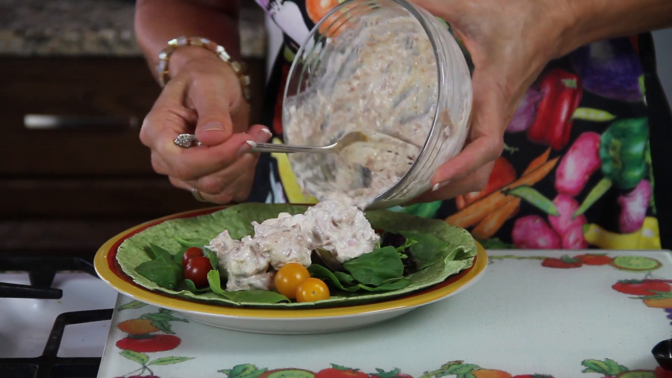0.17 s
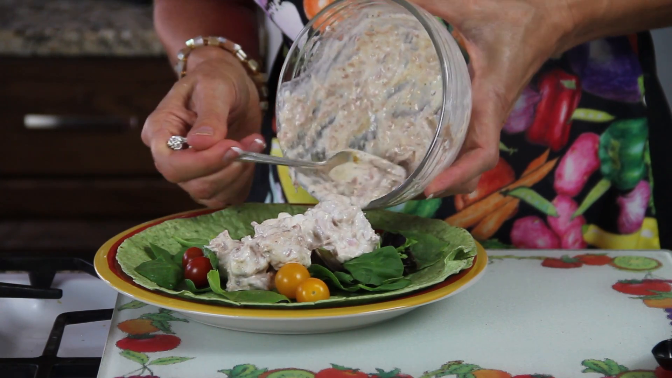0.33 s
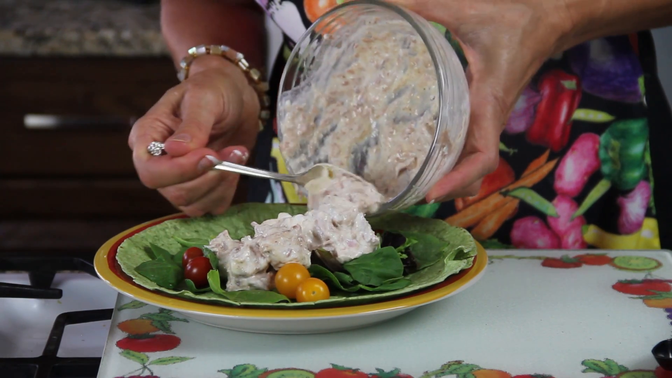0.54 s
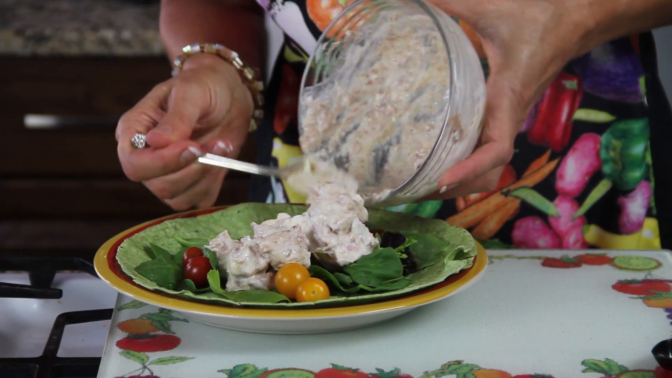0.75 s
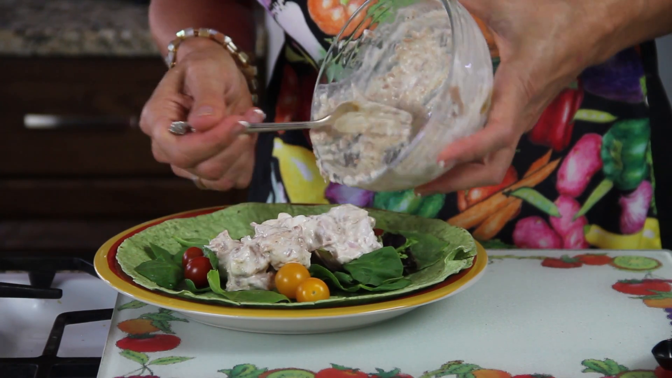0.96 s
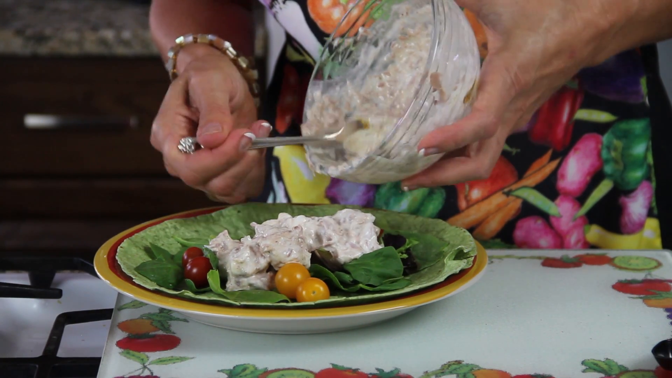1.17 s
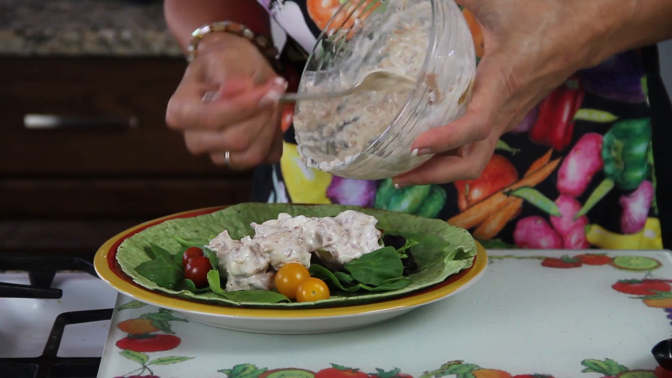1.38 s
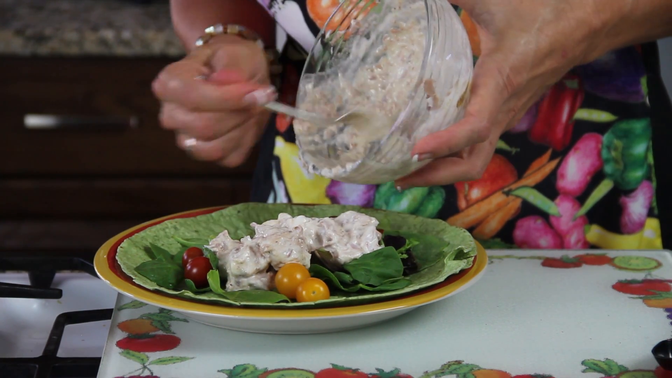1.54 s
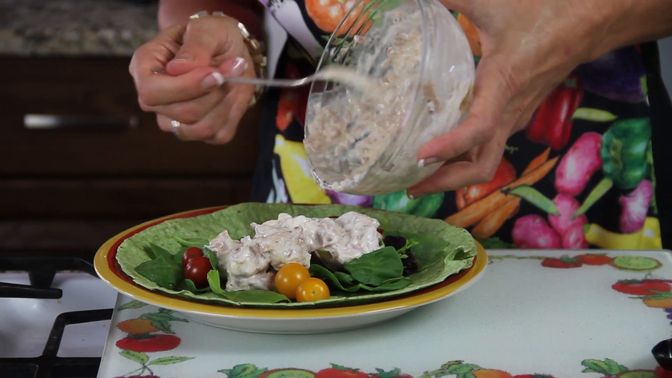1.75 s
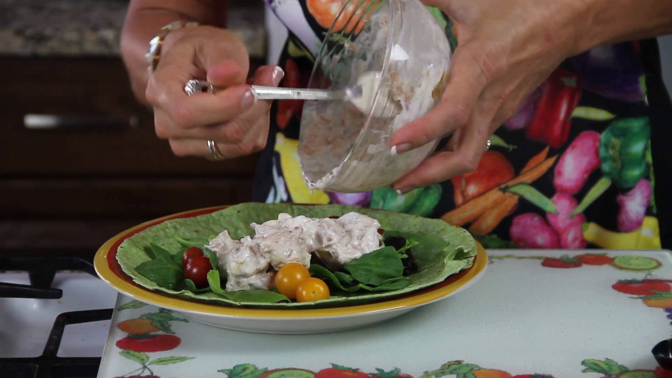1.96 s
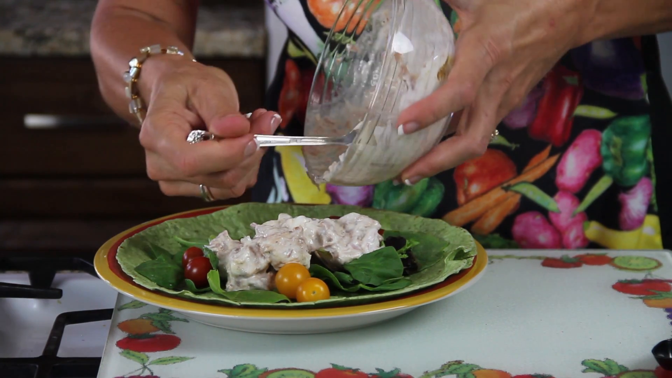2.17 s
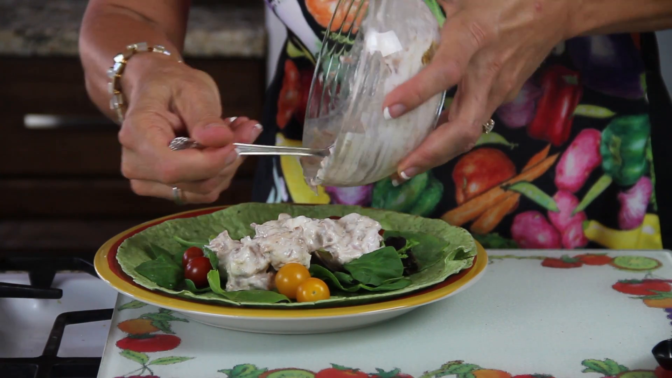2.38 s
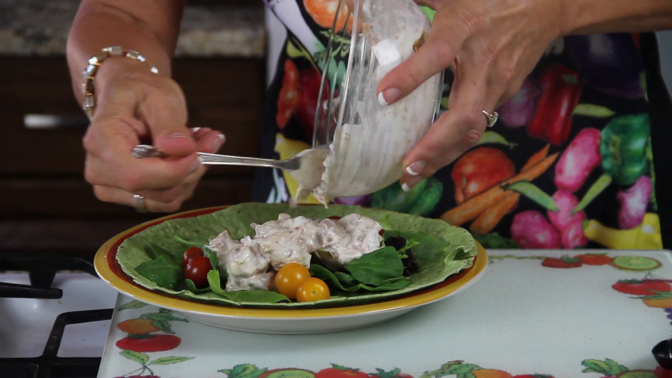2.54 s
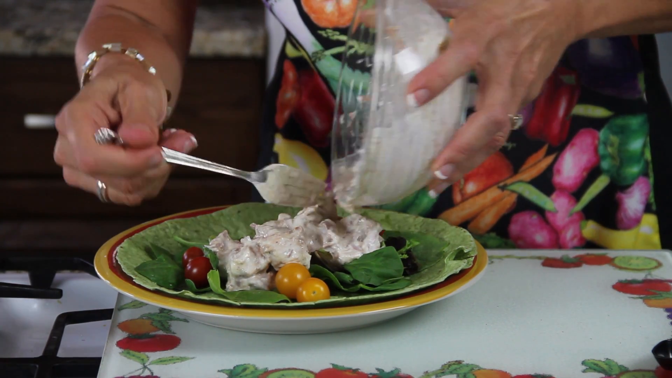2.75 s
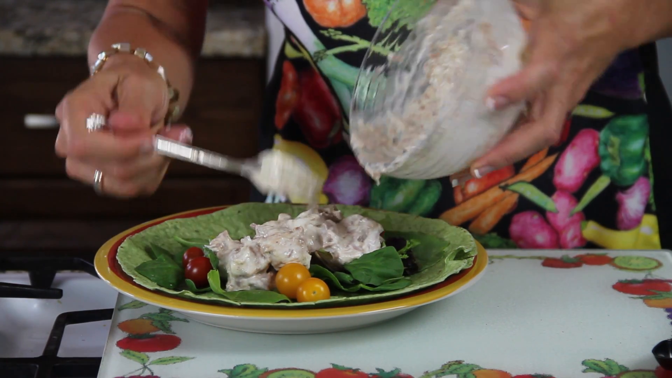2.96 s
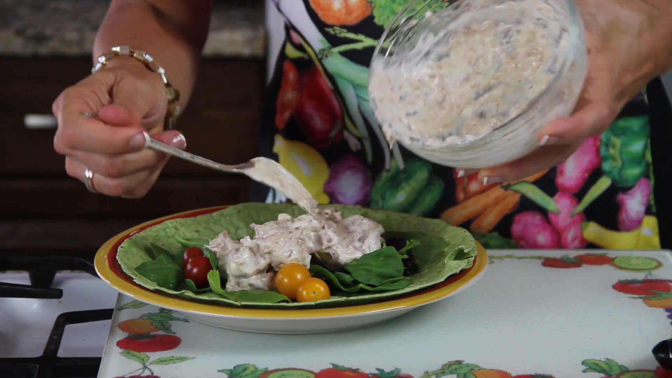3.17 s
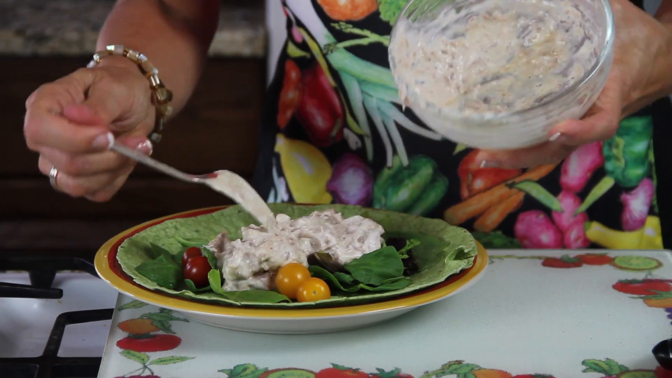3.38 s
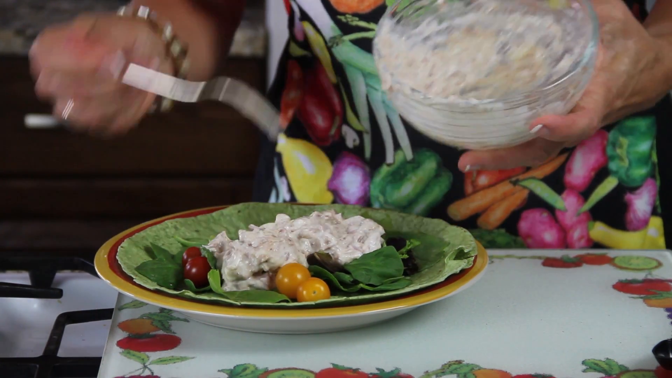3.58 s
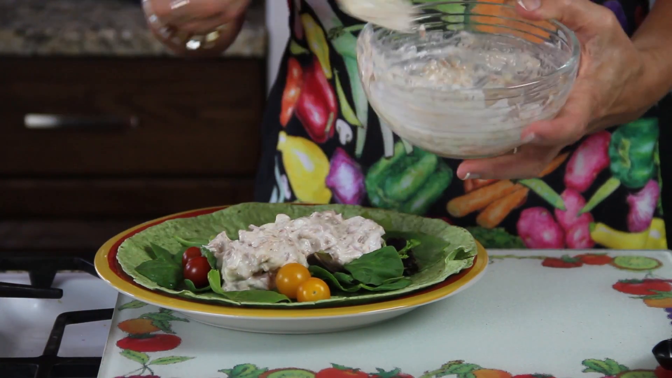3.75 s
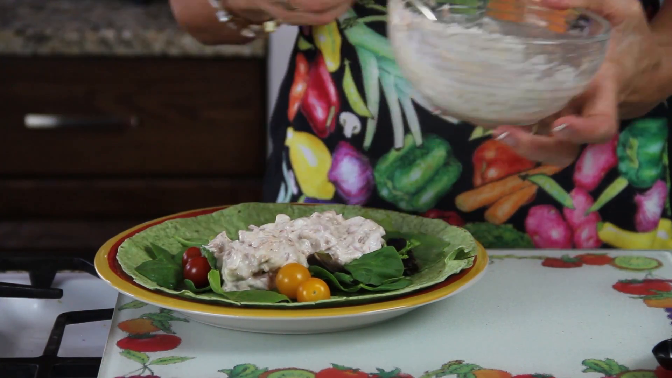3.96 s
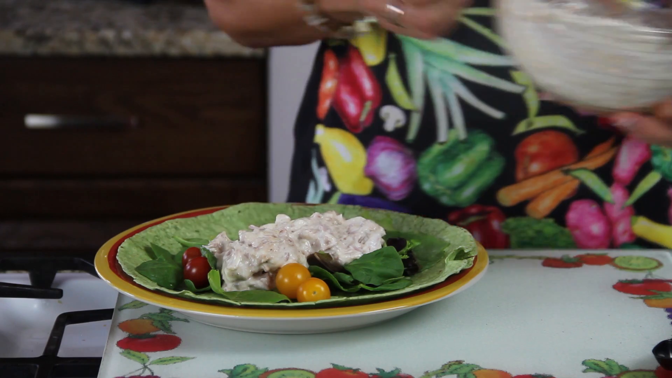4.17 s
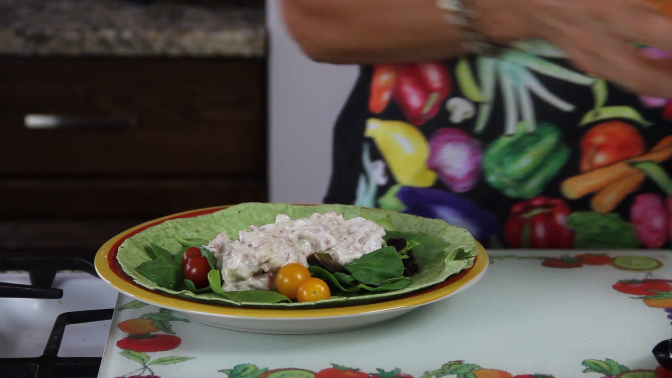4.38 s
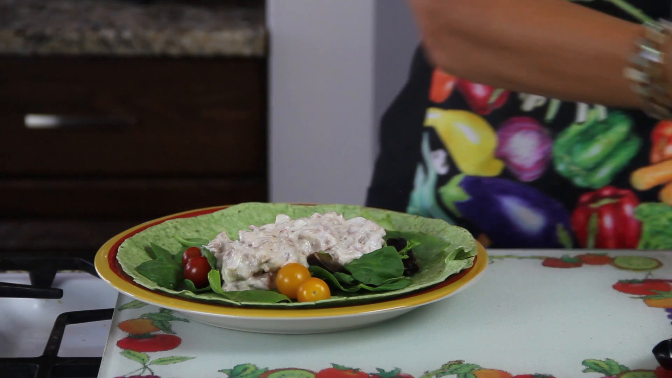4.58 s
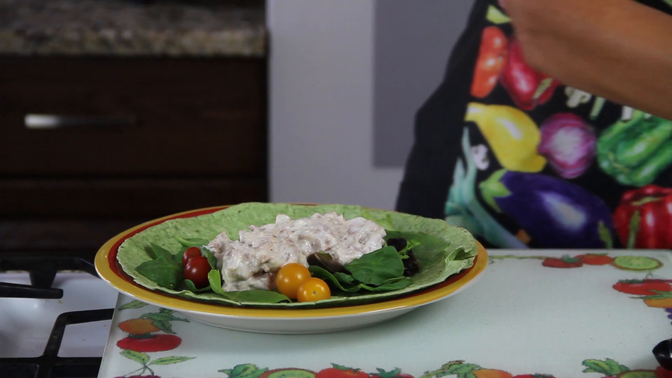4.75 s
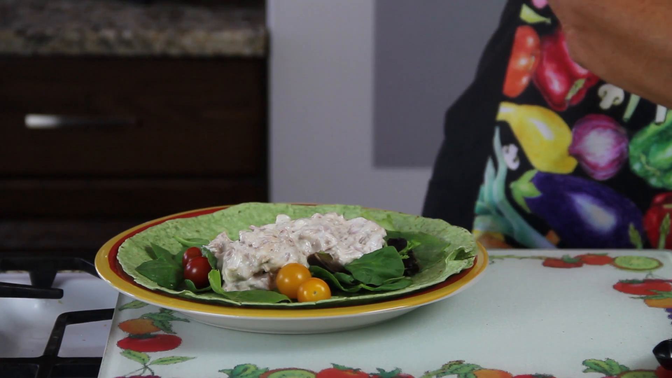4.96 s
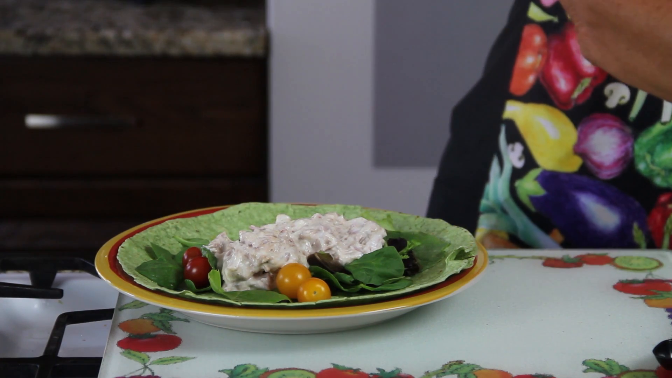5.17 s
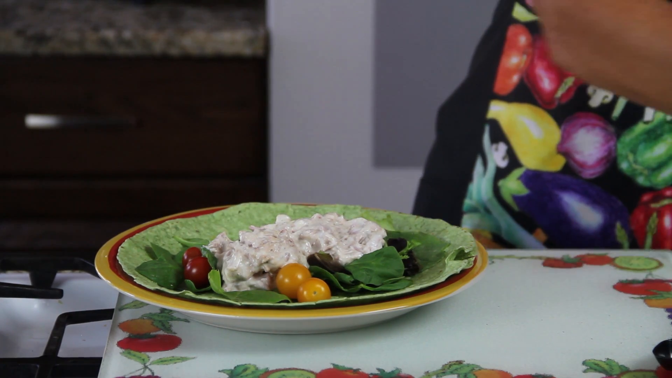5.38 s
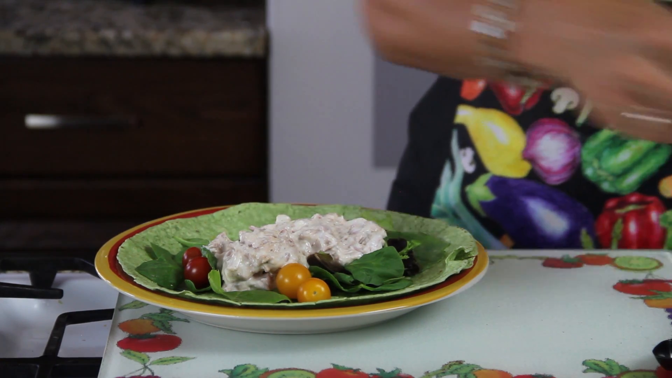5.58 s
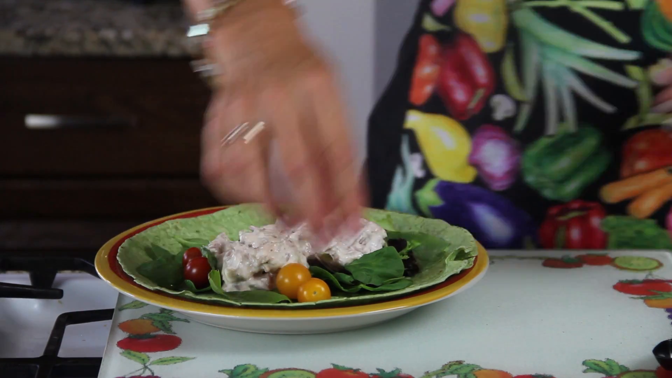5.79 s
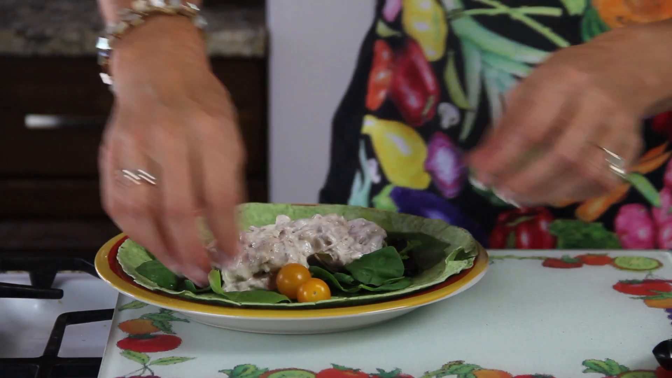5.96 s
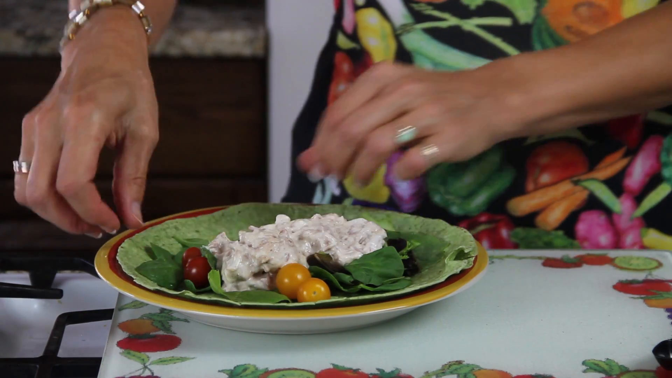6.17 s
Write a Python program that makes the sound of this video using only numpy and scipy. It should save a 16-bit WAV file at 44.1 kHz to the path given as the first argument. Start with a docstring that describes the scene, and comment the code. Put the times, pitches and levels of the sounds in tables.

```python
"""A low room rumble and faint hiss, then a steel fork taps and skids on a hand-held glass bowl of soft salad.
The fork is dropped into the bowl, which is carried aside and set on the counter: it knocks, rocks back, and
the fork rattles. Arms and apron swish as the cook turns and reaches for the plate. Taps and pings are damped
modes plus noise bursts, skids are random slips exciting fork and bowl, landings are decaying noise and cabinet
modes, and cloth and room are coloured noise."""
import sys
import numpy as np
from scipy import signal
from scipy.fft import rfft, irfft, next_fast_len
from scipy.io import wavfile

SR = 44100
rng = np.random.default_rng(int(sys.argv[2]) if len(sys.argv) > 2 else 0)


def unload_wav(signal):
    """Save mono or channel-first audio to the path in sys.argv[1] as 16-bit WAV at rate SR, clipped to [-1, 1]."""
    wavfile.write(
        sys.argv[1],
        SR,
        np.round(np.clip(np.atleast_2d(signal).T, -1, 1) * 32767).astype(np.int16),
    )


N = 274522
T = np.arange(SR * 3 // 4) / SR  # time axis of a single hit [s]


def amp(db):
    """Decibels to linear gain."""
    return 10 ** (np.asarray(db) / 20)


def along(points, hz):
    """Interpolate (frequency, value) points on a log frequency axis."""
    f, v = np.transpose(points)
    return np.interp(np.log(hz + 1), np.log(f + 1), v)


def fade(t60):
    """Free exponential decay by 60 dB in t60 seconds."""
    return np.exp(-np.log(1000) * T / t60)


def struck(x):
    """Scale a hit to rms 1 over its first hundredth of a second."""
    return x / np.sqrt(np.mean(x[:SR // 100] ** 2))


def add(track, s, x):
    """Mix x into the track at time s."""
    part = track[round(s * SR):][:len(x)]
    part += x[:len(part)]


def noise(spectrum):
    """Steady noise of rms 1, coloured by (frequency, level) points."""
    m = next_fast_len(N + SR // 4)
    gain = amp(along(spectrum, np.fft.rfftfreq(m, 1 / SR)))
    x = irfft(rfft(rng.standard_normal(m)) * gain, m)[:N]
    return x / x.std()


def coloured(x, spectrum, size=2048):
    """Colour a hit with a causal minimum-phase filter, so nothing sounds ahead of the blow."""
    log_gain = np.log(amp(along(spectrum, np.fft.rfftfreq(size, 1 / SR))))
    cepstrum = irfft(log_gain)
    # folding the cepstrum onto positive times makes the filter causal
    folded = 2 * cepstrum[:size // 2] * (np.arange(size // 2) > 0)
    colour = irfft(np.exp(rfft(folded, size)))
    return struck(signal.fftconvolve(x, colour)[:len(T)])


def burst(spectrum, t60):
    """Decaying coloured noise, standing for a crowd of dense, quickly dying resonances."""
    return coloured(rng.standard_normal(len(T)) * fade(t60), spectrum)


def ring(modes, detune=0.0049, attack=0.00016):
    """Damped modes; each blow finds them at new strengths and, when detuned, slightly new pitches."""
    hz, db, t60 = np.transpose(modes)
    size, shift, side = rng.standard_normal((len(hz), 3)).T
    pitch = hz * (1 + detune * shift)
    waves = np.sin(2 * np.pi * pitch[:, None] * T) * fade(t60[:, None])
    strength = np.sign(side) * amp(db + 2 * size)
    return struck(strength @ waves * (1 - np.exp(-T / attack)))


# reverberation of the kitchen: (frequency [Hz], t60 [s])
KITCHEN_DECAY = [(150, 0.99), (400, 0.82), (1000, 0.74), (2700, 0.55), (5000, 0.44), (10000, 0.32)]
# strength of the room's answer as the bowl moves: (time [s], level [dB])
ROOM_ANSWER = [(0, -19), (2.2, -12), (4.1, -9.5), (4.35, -20.5), (5.2, -3)]


def room_tail(s, gap=0.0008, build=0.00077):
    """The kitchen's answer to a hit at time s: noise dying at its own rate in each band."""
    _, t, bands = signal.stft(rng.standard_normal(len(T)), SR, nperseg=256)
    hz = np.fft.rfftfreq(256, 1 / SR)
    decay = np.exp(-np.log(1000) * t / along(KITCHEN_DECAY, hz)[:, None])
    tail = signal.istft(bands * decay, SR, nperseg=256)[1][:len(T)]
    tail *= 1 - np.exp(-np.maximum(T - gap, 0) / build)
    level_db = np.interp(s, *np.transpose(ROOM_ANSWER))
    return amp(level_db) * tail / np.linalg.norm(tail)


def in_kitchen(x, s):
    """Direct sound plus the room's answer."""
    return x + signal.fftconvolve(x, room_tail(s))[:len(T)]


# colour of the room rumble and hiss: (frequency [Hz], relative level [dB])
ROOM_COLOUR = [(12, -62), (20, -39), (32, -22), (59, -8), (113, -4.5), (149, -8), (192, -2), (300, -2.5),
               (345, -7), (443, -2.5), (482, -7.5), (754, -12.5), (1150, -18.5), (10100, -23),
               (15800, -21.5)]


def room_noise(level_db=-60):
    """Low rumble and faint hiss as steady noise through the room's spectrum."""
    return amp(level_db) * noise(ROOM_COLOUR)


# arm and apron sweep past: (time of full speed [s], hold [s], rise [dB/s], level at full speed [dB])
CLOTH_SWEEPS = [(4.828, 0.18, 32, -51.5), (6.103, 0.013, 175, -42)]
# colour of flapping cloth: (frequency [Hz], relative level [dB])
CLOTH_FLAP = [(21, -49), (35, -24), (92, 0.5), (162, 1.5), (347, -4.5), (384, -8), (700, -45), (910, -45),
              (1540, -120)]
# colour of rubbing cloth: (frequency [Hz], relative level [dB])
CLOTH_RUB = [(250, 1), (550, 1.5), (1100, -2), (2500, -12.5), (6000, -21.5), (12000, -35)]
# soft bumps of hand and body: (time [s], level [dB])
BODY_BUMPS = [(4.354, -51.5), (4.4003, -45.5), (4.455, -62.5), (6.109, -47), (6.118, -50)]
# colour of a soft bump: (frequency [Hz], relative level [dB])
BUMP_COLOUR = [(30, -3), (80, 11), (220, 9), (450, 4), (900, -13), (3000, -60)]
# beads click on the wrist: (time [s], level [dB])
BRACELET_CLICKS = [(5.354, -44)]
# colour of a bead click: (frequency [Hz], relative level [dB])
BEAD_COLOUR = [(1000, -24), (4000, -5), (5200, 7), (6300, -4), (8000, -11.5), (10000, -26), (16000, -32)]


def movement(flap_db=0, rub_db=-6, settle_db_per_s=342):
    """Cloth noise swells, holds and settles with each sweep; bumps and bead clicks are short bursts."""
    out, t = np.zeros(N), np.arange(N) / SR
    for s, hold, rise, db in CLOTH_SWEEPS:
        swell_db = rise * np.maximum(s - t, 0)
        settle_db = settle_db_per_s * np.maximum(t - s - hold, 0)
        cloth = amp(flap_db) * noise(CLOTH_FLAP) + amp(rub_db) * noise(CLOTH_RUB)
        out += amp(db - swell_db - settle_db) * cloth
    for s, db in BODY_BUMPS:
        add(out, s, amp(db) * burst(BUMP_COLOUR, t60=0.1))
    for s, db in BRACELET_CLICKS:
        add(out, s, amp(db) * burst(BEAD_COLOUR, t60=0.058))
    return out


# first instant of a hard contact, on counter or glass: (frequency [Hz], relative level [dB])
CLICK_COLOUR = [(1000, -12), (5000, 0), (10000, -1), (16000, -8)]


def click():
    """The first instant of a hard contact: a very short bright burst."""
    return amp(-25) * burst(CLICK_COLOUR, t60=0.011)


# the bowl lands on the counter: (time [s], knock level [dB], thump level [dB], first blow level [dB])
BOWL_LANDINGS = [(5.2066, -22.5, -37.5, -22.5), (5.4312, -31, -62, -48)]
# modes of counter and cabinet: (frequency [Hz], relative level [dB], t60 [s])
CABINET_MODES = [(385, 1.5, 0.46), (532, 0.5, 0.7), (668, -1.5, 0.73), (830, -3, 0.62), (820, -12.5, 0.38),
                 (972, -13, 0.45), (980, 3, 0.28), (1018, 13, 0.3), (1106, -1, 0.61), (1160, -8, 0.74),
                 (1280, 1, 0.62), (1310, 6, 0.52), (1656, -9, 0.31), (1703, 2.5, 0.34), (1722, -1, 0.59),
                 (2240, -9, 0.56), (2400, -15, 0.31), (2440, 4, 0.38), (3160, -2, 0.29)]
# colour of glass base on worktop: (frequency [Hz], relative level [dB])
KNOCK_COLOUR = [(60, -48), (250, -10.5), (500, -4.5), (950, 7), (1400, 0), (1900, 0.5), (3000, -15),
                (6500, -23.5), (8000, -31), (16000, -65)]
# colour of the cabinet's thump: (frequency [Hz], relative level [dB])
THUMP_COLOUR = [(20, -17), (45, -8), (90, -3), (200, -7.5), (500, -41), (2000, -70)]


def counter(knock_t60=0.21, room_db=-2, cabinet_db=-6):
    """The heavy base hits with one sharp blow and a dense clatter; the cabinet thumps and rings on."""
    out = np.zeros(N)
    for s, knock_db, thump_db, blow_db in BOWL_LANDINGS:
        blow = burst(KNOCK_COLOUR, t60=0.0051) + click()
        clatter = rng.standard_normal(len(T)) * fade(knock_t60)
        clatter /= np.linalg.norm(clatter)
        knock = coloured(clatter + amp(room_db) * room_tail(s), KNOCK_COLOUR)
        cabinet = amp(cabinet_db) * ring(CABINET_MODES, detune=0, attack=0.002)
        add(out, s, amp(knock_db) * (knock + cabinet))
        add(out, s, amp(thump_db) * burst(THUMP_COLOUR, t60=0.051))
        add(out, s, amp(blow_db) * blow)
    return out


# bending modes of the bowl: (frequency [Hz], relative level [dB], split of the twin mode [Hz],
# share of the contact's ring time [ratio], build-up before softness [s], free t60 of the twin [s])
BOWL_MODES = [(1076, -6.5, 18, 0.89, 0.0014, 0.11), (2538, -3, 30, 0.78, 0.00073, 0.11),
              (4393, -2, 55.6, 0.46, 0.000099, .3), (6550, -16, 80, 0.22, 0.0015, 0.033),
              (9020, -30, 20, 0.42, 0.00031, .13)]
# the fork works round the bowl as grip and food shift:
# (time [s], pitch of the ring [cents], boost of odd and cut of even modes [dB])
CONTACT_PLACE = [(.56, -19, -2.5), (.75, 1.5, -2), (1.3, 2, 0.5), (1.75, -15, 9.5), (2.09, -1, -5.5),
                 (2.128, 0, 11.5), (2.145, 4.5, -1.5), (2.25, -9, -0.5), (4.1, 4.5, 2), (4.3, 4, -2.5),
                 (5.45, 9.5, -2.5)]
PIVOT_HZ = 2370  # brightness tilts the modes about this pitch
SOFT_DOUBLING = 5  # a contact this much duller [dB/kHz] takes twice as long to build up


def glass(s, t60, brightness, shove_db=0, twin=0.096, drag=0.00066):
    """A pressed fork shortens and flattens the ring; each mode's twin has a node there and rings on."""
    out = np.zeros(len(T))
    times, *columns = np.transpose(CONTACT_PLACE)
    cents, odd_db = [np.interp(s, times, column) for column in columns]
    for k, (hz, db, split_hz, share, build, free_t60) in enumerate(BOWL_MODES):
        pitch = hz * 2 ** (cents / 1200) * (1.006 - drag / t60)
        tilt_db = brightness * (hz - PIVOT_HZ) / 1000
        a, b = rng.uniform(0, 2 * np.pi, 2)
        pair = np.sin(2 * np.pi * pitch * T + a) * fade(t60 * share)
        pair += twin * np.sin(2 * np.pi * (pitch + split_hz) * T + b) * fade(free_t60)
        # the lowest mode moves the whole wall, wherever it is hit
        place_db = shove_db if k == 0 else odd_db * (-1) ** k
        rise = build * 2 ** (-brightness / SOFT_DOUBLING)
        out += amp(db + tilt_db + place_db) * struck(pair * (1 - np.exp(-T / rise)))
    return out


# fork stem, damped by fingers and food: (frequency [Hz], relative level [dB], t60 [s])
STEM_MODES = [(1030, 0, 0.04), (1348, -13, 0.053), (2100, 6, 0.016), (2274, 11, 0.011), (2600, -16, 0.066),
              (2954, 9, 0.018), (3934, 0.5, 0.031)]
# fork tines, damped by food: (frequency [Hz], relative level [dB], t60 [s])
TINE_MODES = [(4390, 9.5, 0.0088), (4910, -6, 0.066), (5590, 10.5, 0.0054), (5840, -9.5, 0.015),
              (6490, -10, 0.034), (6990, -12, 0.046)]
# colour of steel cracking on glass: (frequency [Hz], relative level [dB])
CRACK_COLOUR = [(200, 7.5), (1000, -29.5), (2500, 7.5), (4700, 12), (6800, -47), (8000, -9), (11000, -17),
                (16000, -32)]
# the fork chatters along the glass: (start [s], end [s], level [dB], brightness [dB/kHz])
FORK_SKIDS = [(0.475, 0.545, -54, -11.5), (0.57, 0.612, -52, -3), (2.107, 2.125, -40.5, -3),
              (4.237, 4.311, -35, 4.5)]
# a tine tip slips off and pings, longer when no food clings: (time [s], level [dB], ring time factor [ratio])
TINE_FLICKS = [(0.48, -57, .6), (.703, -58, 0.61), (0.76, -49, 0.57), (1.205, -63.5, 1.8),
               (1.591, -47, 2.5), (1.775, -56.5, 1.2), (2.554, -67.5, 0.87)]
# modes of a tine tip: (frequency [Hz], relative level [dB], t60 before the flick's factor [s])
TIP_MODES = [(3650, -0.5, 0.031), (4680, -9, 0.066), (6440, 2, 0.033), (6150, 4, 0.033),
             (6620, 11.5, 0.013), (7400, -12, 0.02)]


def scrape(slips_per_s=700, tines_db=-5, grit_db=-8, glass_db=-8, ring_t60=0.054):
    """Uneven stick-slip keeps fork and glass buzzing; single tines ping as they let go."""
    out = np.zeros(N)
    for start, end, db, brightness in FORK_SKIDS:
        during = T < end - start
        slip_now = rng.random(len(T)) < slips_per_s / SR
        slips = during * slip_now * np.tanh(rng.standard_normal(len(T)))
        steel = ring(STEM_MODES) + amp(tines_db) * ring(TINE_MODES)
        grit = amp(grit_db) * burst(CRACK_COLOUR, t60=0.0012)
        bowl = amp(glass_db) * glass(start, ring_t60, brightness)
        buzz = signal.fftconvolve(slips, steel + grit + bowl)[:len(T)]
        add(out, start, in_kitchen(amp(db) * buzz / buzz[during].std(), start))
    for s, db, longer in TINE_FLICKS:
        ping = ring(np.multiply(TIP_MODES, [1, 1, longer]))
        add(out, s, in_kitchen(amp(db) * ping, s))
    return out


# the fork meets the glass: (time [s], ring t60 before each mode's share [s], glass level [dB],
# brightness [dB/kHz], fork level [dB], lean from stem to tines [dB])
FORK_TAPS = [(0.4641, 0.074, -44, -0.7, -49.5, -14), (.559, 0.085, -24.5, -0.94, -39, -0.5),
             (.666, 0.12, -46, -1.5, -56.5, -6), (.701, 0.1, -48, -5.5, -66, 1),
             (.752, 0.21, -41.5, -2.5, -60, 1), (1.2054, 0.016, -72, 2, -71, -4),
             (1.303, 0.33, -53.5, -9, -71, -5), (1.335, 0.064, -57.5, -10.5, -67, -4),
             (1.589, .018, -58.5, -9, -71.5, 14), (1.751, .16, -48, -7.3, -70, 11),
             (2.1022, 0.2, -30.5, -.5, -51.5, -6), (2.129, .03, -56, 1, -47, 2.5),
             (2.1417, 0.18, -36, 0.1, -40.5, -1), (2.256, .055, -44, -1.2, -52, -3),
             (2.616, 0.062, -46.5, -1.5, -58, -7.5), (2.805, 0.066, -74.5, -17.5, -90, 13),
             (2.844, 0.062, -79, -18, -92, 2), (2.903, 0.071, -72.5, -16.5, -83, -2),
             (4.106, .15, -38, 3.5, -29, -1), (4.236, 0.09, -36.5, 2, -38, -1),
             (4.286, 0.16, -56, -16, -40.5, 3.5), (4.294, .07, -28, .5, -36.5, 2),
             (4.306, 0.12, -39.5, 1.5, -47.5, 10.5), (4.355, 0.23, -50, 1.5, -62, 7),
             (5.2325, 0.077, -40.5, 3.1, -36, -0.5), (5.241, 0.095, -41, 2, -36, -3),
             (5.4462, 0.074, -48.5, 1.5, -50, -6), (5.4494, 0.093, -45.5, 2.5, -49, 5)]
# colour of the thud behind a tap: (frequency [Hz], relative level [dB])
THUD_COLOUR = [(30, -19.5), (110, -7), (400, -8), (800, -8), (1600, -9.5), (4000, -41)]
LIGHT_TOUCH_S = 0.056  # ring time of an ordinary tap; each halving is one step of pressure
SHOVE_DB, THUD_PRESS_DB = 4, 6  # gain a step: the lowest mode, the thud
THUD_DB, THUD_GROWS = -24.5, 0.52  # the thud follows the glass level only weakly
LET_GO_S, LOOSE_DB = 3.6, -6.5  # once the fork is let go, no hand pushes behind it


def fork(stem_db=-1, tines_db=-1, crack_db=-5):
    """Each tap rings the bowl and clacks the fork; harder pressure shoves the bowl and thuds more."""
    out = np.zeros(N)
    for s, t60, glass_db, brightness, fork_db, lean_db in FORK_TAPS:
        pressure = np.log2(LIGHT_TOUCH_S / t60)
        thud_db = THUD_DB + THUD_GROWS * glass_db + THUD_PRESS_DB * pressure
        thud_db += LOOSE_DB * (s > LET_GO_S)
        crack = amp(crack_db) * burst(CRACK_COLOUR, t60=0.075)
        tines = amp(tines_db) * ring(TINE_MODES) + crack + click()
        hit = amp(glass_db) * glass(s, t60, brightness, SHOVE_DB * pressure)
        hit += amp(fork_db - lean_db + stem_db) * ring(STEM_MODES)
        hit += amp(fork_db + lean_db) * tines
        hit += amp(thud_db) * burst(THUD_COLOUR, t60=0.049)
        add(out, s, in_kitchen(hit, s))
    return out


def scene():
    """Room noise, cook, counter and fork mixed to one channel."""
    return (room_noise() + movement() + counter() + scrape() + fork())[None]


def record(dry, top_hz=15900):
    """Keep nothing above the band limit."""
    m = next_fast_len(N + SR // 2)
    kept = np.fft.rfftfreq(m, 1 / SR) < top_hz
    return irfft(rfft(dry, m) * kept, m)[:, :N]


dry = scene()
out = record(dry)
unload_wav(out)
```